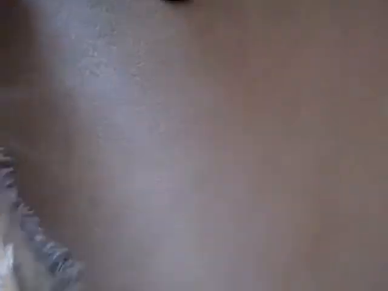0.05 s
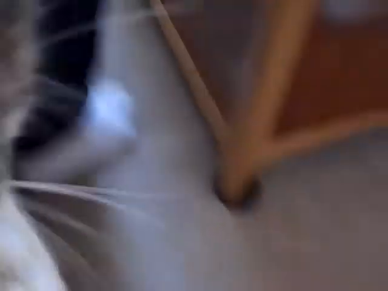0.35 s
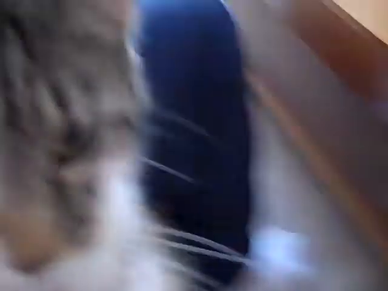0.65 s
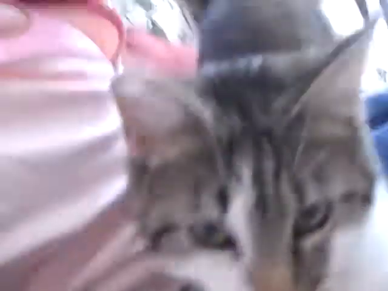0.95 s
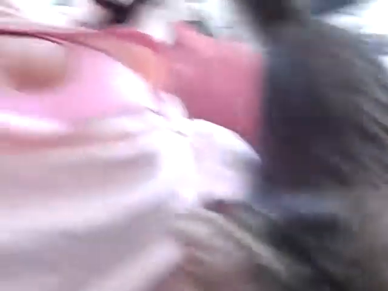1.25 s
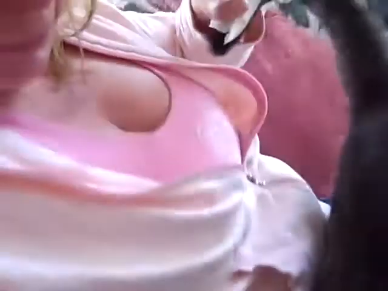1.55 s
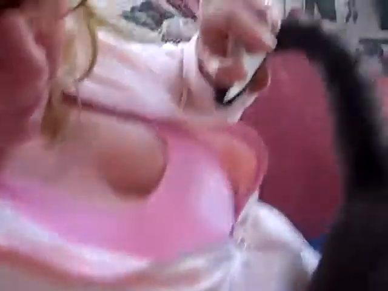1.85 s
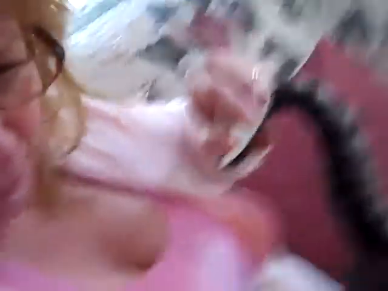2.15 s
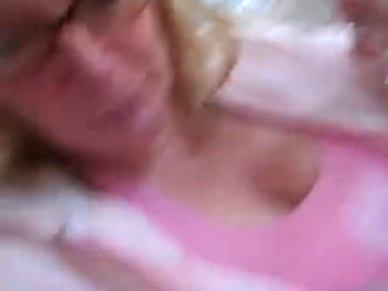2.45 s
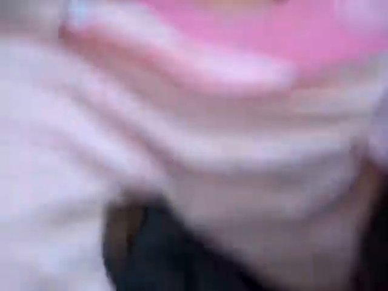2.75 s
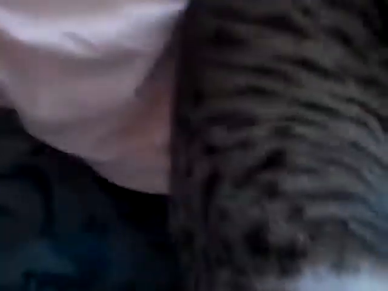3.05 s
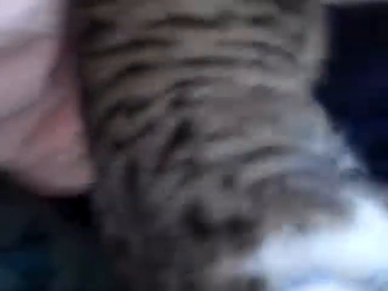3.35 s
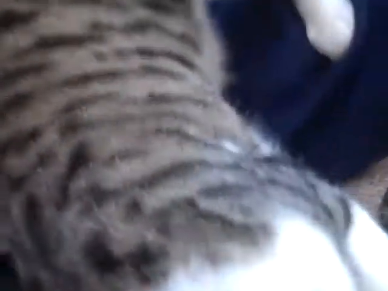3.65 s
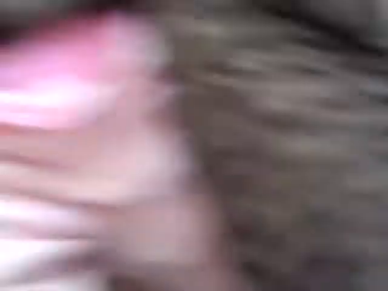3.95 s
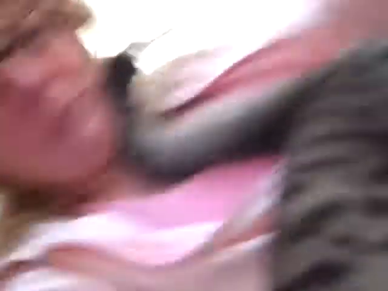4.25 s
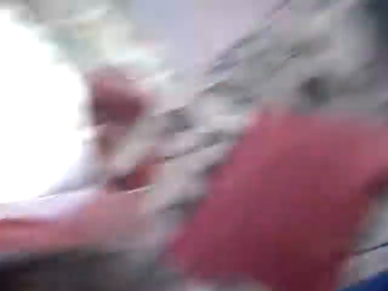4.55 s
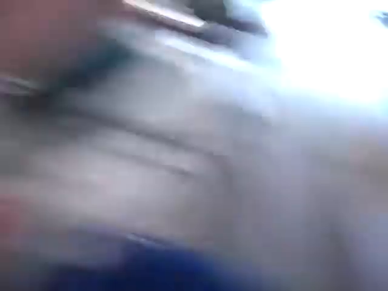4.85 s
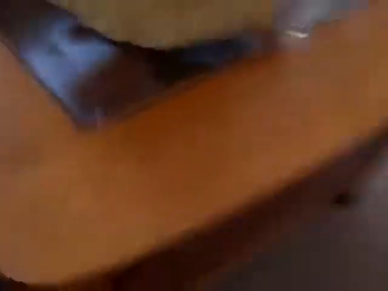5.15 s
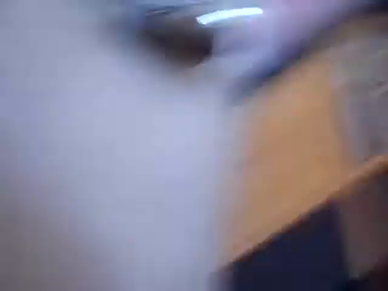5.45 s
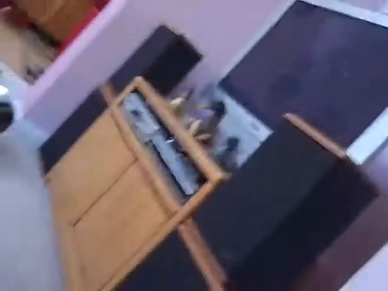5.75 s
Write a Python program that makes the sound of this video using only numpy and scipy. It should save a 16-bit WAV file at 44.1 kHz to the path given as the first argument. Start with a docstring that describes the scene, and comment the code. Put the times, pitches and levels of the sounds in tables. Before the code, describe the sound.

Close cat purring with light metallic clinks, mixed with rustling and handling knocks that grow loudest near the end.

```python
"""A house cat purrs as it climbs over a lap, a hand's width from a small hand-held camera.
From the start, strokes of vocal-fold pulses excite its chest and throat, while fur and cloth brush
the camera and fingers knock on the case. From 1.2 to 3.3 s small metal pieces jingle in their free
modes; around 3 s the nose passes closest and its turbulent air rasps. After 4 s the rubbing and
knocking grow firmer over the purr, and are loudest near 5.6 s."""
import sys
import numpy as np
from scipy import signal
from scipy.fft import rfft, irfft
from scipy.io import wavfile

SR = 44100
rng = np.random.default_rng(int(sys.argv[2]) if len(sys.argv) > 2 else 0)


def file_out(sig):
    """Save sig as 16-bit WAV at sys.argv[1]."""
    # one column per channel
    cols = np.atleast_2d(sig).T
    # limit, then scale
    lim = np.clip(cols, -1, 1)
    pcm = np.round(lim * 32767).astype(np.int16)
    wavfile.write(sys.argv[1], SR, pcm)


N = 259308
T = np.arange(N) / SR
EVENT_T = T[:SR // 6]  # time axis of one short event


def undb(db):
    """Amplitude ratio of a level in decibels."""
    return 10 ** (np.asarray(db) / 20)


def unit(x):
    """Normalisation to rms 1."""
    return x / np.sqrt(np.mean(x ** 2) + 1e-30)


def pan(db):
    """Constant-power panning; db is left minus right, as is every pan_db."""
    return unit(undb(np.array([[db], [-db]]) / 2))


def noise(correlation, size=N):
    """Partly coherent white noise at the two microphone ports."""
    mid, side = rng.standard_normal((2, size))
    return np.sqrt((1 + correlation) / 2) * mid + np.sqrt((1 - correlation) / 2) * np.array([side, -side])


def colour(x, points, size=4096):
    """Minimum-phase filter through (frequency_hz, gain_db) points."""
    hz, db = np.transpose(points)
    bins_hz = np.maximum(np.fft.rfftfreq(size, 1 / SR), 1)
    cepstrum = irfft(np.log(undb(np.interp(np.log(bins_hz), np.log(hz), db))))
    cepstrum[1:size // 2] *= 2
    cepstrum[size // 2 + 1:] = 0
    response = irfft(np.exp(rfft(cepstrum)))
    return signal.fftconvolve(x, response[None], axes=-1)[:, :x.shape[-1]]


def resonate(x, hz, width_hz):
    """Second-order resonator with gain 1 at its centre."""
    return signal.lfilter(*signal.iirpeak(hz, hz / width_hz, fs=SR), x)


def band(x, hz, width_hz):
    """Two resonators in cascade give a band with steeper skirts."""
    return resonate(resonate(x, hz, width_hz), hz, 2 * width_hz)


def resonances(x, modes):
    """Modal superposition: parallel resonators share one excitation."""
    return sum(undb(db) * resonate(x, hz, width_hz) for hz, width_hz, db in modes)


def fade(t, t60):
    """Exponential decay, 60 dB in t60 seconds."""
    return undb(-60 * t / t60)


def burst(x, db):
    """Energy normalisation: a transient gets the energy of 10 ms at this level."""
    return x * undb(db) * np.sqrt(SR / 100 / np.mean(np.sum(x ** 2, axis=-1)))


def add(out, start_s, x):
    """Superposition of x on out from start_s on."""
    i = max(int(start_s * SR), 0)
    out[:, i:i + x.shape[-1]] += x[..., :max(N - i, 0)]


def swell(peak_s, rise_s, fall_s, roundness=1.29):
    """Envelope of a movement, 20 dB down at rise_s before its peak and fall_s after."""
    return undb(-20 * np.maximum((peak_s - T) / rise_s, (T - peak_s) / fall_s) ** roundness)


def rough_noise(correlation, patchy_db, grain_db):
    """Random amplitude modulation: catching fibres or ragged air give fine grains in uneven patches."""
    patches = np.interp(T, np.arange(1400) / 220, np.minimum(rng.standard_normal(1400), 2))
    grains = np.repeat(np.minimum(rng.standard_normal(N // 16 + 1), 2.3), 16)[:N]
    return noise(correlation) * undb(patchy_db * patches + grain_db * grains)


# spectrum of room and microphone noise: frequency_hz, gain_db
ROOM_SPECTRUM = [(25, -14), (60, 3), (90, -3.5), (120, 9), (170, 6), (300, 1.5), (600, 0.5), (1200, -7),
                 (2500, -9.5), (5000, -15), (7700, -61), (10000, -16.5), (14000, -21)]
def room(level_db=-59):
    """Stationary noise of the quiet room and the microphone."""
    return undb(level_db) * unit(colour(noise(0.27), ROOM_SPECTRUM)) * pan(1)


# resonances of case and ports: centre_hz, width_hz, left_db, right_db
PORT_MODES = [(1333, 21, 2, -0.5), (1874, 650, 10.5, 9.5), (2360, 46, 4.5, -30), (2907, 53, -15, 5),
              (4180, 120, -17, -9), (4460, 31, -20, -4), (6140, 2300, -3.5, 3.5), (7060, 790, -24, 5.5),
              (8060, 600, 14.5, -20), (9600, 1850, 7.5, -24), (13600, 300, 1, -21)]
def ports(x):
    """Structure-borne sound reaches each port through its own resonances."""
    return x + sum(undb([[left], [right]]) * resonate(x, hz, width) for hz, width, left, right in PORT_MODES)


# swings of the camera: peak_s, rise_s, fall_s, level_db
CAMERA_SWINGS = [(.12, 0.38, 0.28, -59.5), (4.15, 0.33, 0.36, -53.5), (4.97, 0.23, 0.68, -54.5),
                 (5.52, 0.086, 0.13, -66), (5.79, 0.24, 0.2, -47)]
# spectrum of their rumble: frequency_hz, gain_db
RUMBLE_SPECTRUM = [(25, -28), (50, -30), (130, 3), (240, -5.5), (400, -2.5), (700, -7.5), (1200, -9),
                   (1700, -12.5), (3000, -34)]
def rumble():
    """Low-frequency handling noise follows each swing of the camera in the hand."""
    motion = sum(undb(db) * swell(*timing, roundness=1) for *timing, db in CAMERA_SWINGS)
    return unit(colour(rough_noise(0.12, patchy_db=3, grain_db=5), RUMBLE_SPECTRUM)) * motion


# resonances of the shell: centre_hz, width_hz, gain_db
SHELL_MODES = [(1844, 54, -3), (4300, 240, 2), (6780, 1170, 3)]
def scratches(catches_per_s=260, spread_db=5):
    """Stick-slip: fibres catch and let go, each impulse ringing the shell at one port."""
    catches = (rng.random((2, N)) < catches_per_s / SR) * np.sign(rng.standard_normal((2, N)))
    strength = undb(spread_db * np.minimum(rng.standard_normal((2, N)), 1.5))
    return unit(ports(resonances(catches * strength, SHELL_MODES)))


# light, unbroken rustle of fur and cloth: time_s, level_db
LIGHT_RUSTLE = [(0.0, -62), (0.36, -61.5), (0.75, -65), (1.12, -59), (1.4, -63), (2.22, -60), (3.16, -54),
                (3.63, -66), (3.93, -67), (4.0, -73), (5.15, -73), (5.88, -58)]
# firm rubs: peak_s, rise_s, fall_s, hiss_db, scrape_db, fizz_db
FIRM_RUBS = [(.19, 0.39, 0.24, -62, -60.5, -75), (.84, 0.095, 0.029, -57, -58.5, -67),
             (.92, 0.049, 0.05, -68, -58, -74), (1.10, 0.05, 0.065, -50.5, -77, -75),
             (1.63, 0.28, 0.078, -54.5, -68, -68), (2.92, 0.45, 0.3, -81, -64, -80),
             (3.21, 0.043, 0.083, -61, -69, -75), (4.12, 0.14, 0.13, -46.5, -47.5, -50.5),
             (4.31, 0.085, 0.053, -51, -56.5, -59), (4.531, 0.15, 0.078, -43, -52, -47),
             (4.69, 0.16, 0.69, -49.5, -57, -54), (4.804, 0.04, 0.064, -42, -51.5, -47.5),
             (4.88, 0.082, 0.023, -59, -62, -73), (4.995, 0.085, 0.06, -41, -49, -52),
             (5.059, 0.054, 0.058, -55, -59, -74), (5.33, 0.2, 0.21, -67, -67, -68),
             (5.46, 0.099, 0.35, -51.5, -58, -58), (5.531, 0.0087, 0.034, -46.5, -37.5, -62),
             (5.598, 0.026, 0.059, -29, -39, -42), (5.635, 0.037, 0.055, -26.5, -34.5, -35),
             (5.69, 0.14, 0.12, -37.5, -46.5, -49), (5.755, 0.052, 0.078, -41, -68, -70)]
# spectra of fur on the ports, fur on the case and single hairs: frequency_hz, gain_db
HISS_SPECTRUM = [(1500, -21.5), (2600, -1.5), (4000, 3.5), (5200, 1.5), (6500, 3), (7700, 0.5), (8600, -2),
                 (10000, -13), (12000, -25), (14200, -22), (15000, -39)]
SCRAPE_SPECTRUM = [(200, -0.5), (600, 3), (1000, 4), (1400, 0.5), (1850, -6.5), (2300, -5), (3200, 0.5),
                   (4500, 1.5), (8000, -21)]
FIZZ_SPECTRUM = [(5000, -42), (8000, 9.5), (9500, 5), (12000, -5), (14200, -5), (15000, -33)]
def rubbing():
    """Friction noise of fur and cloth over the camera's rumble; overlapping rubs add in power."""
    rustle_db = np.interp(T, *np.transpose(LIGHT_RUSTLE))
    gains = undb([rustle_db + 1, rustle_db - 6.5, rustle_db - 9])
    for peak_s, rise_s, fall_s, *levels_db in FIRM_RUBS:
        gains = np.hypot(gains, undb(levels_db)[:, None] * swell(peak_s, rise_s, fall_s))
    hiss_gain, scrape_gain, fizz_gain = gains
    hiss = unit(ports(colour(rough_noise(-0.099, patchy_db=2.5, grain_db=2.5), HISS_SPECTRUM)))
    scrape = unit(ports(colour(rough_noise(0.31, patchy_db=4.5, grain_db=4), SCRAPE_SPECTRUM)))
    fizz = unit(colour(rough_noise(0, patchy_db=4, grain_db=0), FIZZ_SPECTRUM))
    case = scrape * scrape_gain + rumble()
    fur = (undb(-2) * hiss + undb(-6) * scratches()) * hiss_gain
    lean = (hiss_gain / undb(-50)) ** np.array([[-.06], [.06]])  # firm to the right, light to the left
    return lean * (fur + case) + fizz * fizz_gain


# drags of a fingertip: peak_s, rise_s, fall_s, pitch_hz, level_db
FINGER_DRAGS = [(4.52, .08, 0.097, 1870, -56), (4.7, 0.025, .03, 4450, -52), (4.79, 0.036, .06, 4200, -54),
                (4.83, .1, 0.21, 1870, -56.5), (5.0, 0.095, .12, 1850, -61)]
def finger_drags(relative_width=.1):
    """Forced vibration: a dragging fingertip keeps one resonance of the shell sounding."""
    drag = rough_noise(.2, patchy_db=4, grain_db=3)
    return sum(undb(db) * swell(*timing) * unit(band(drag, hz, relative_width * hz))
               for *timing, hz, db in FINGER_DRAGS) * pan(-2.3)


# bumps of the whole camera and creaks of its case: start_s, level_db, pitch_hz, t60_s
CAMERA_BUMPS = [(0.586, -46, 110, 0.031), (0.597, -49, 139, 0.036), (3.635, -50.5, 85, 0.024),
                (4.115, -46, 140, 0.13), (4.152, -39.5, 139, 0.12), (5.662, -47, 123, 0.036)]
CASE_CREAKS = [(0.2774, -39, 3840, 0.004), (0.2795, -39, 1700, 0.018), (0.586, -48, 1880, 0.025),
               (0.597, -45.5, 1930, 0.019), (2.391, -47, 1820, 0.0086), (2.481, -48, 1600, 0.009),
               (4.715, -40.5, 1980, 0.015), (4.745, -59, 1900, 0.018), (4.972, -41.5, 7450, 0.0065),
               (5.3516, -33, 2740, 0.002), (5.587, -47, 1830, 0.057), (5.592, -36, 7240, 0.014),
               (5.599, -33.5, 1780, 0.073), (5.645, -42, 2450, 0.024)]
# twists of the case: start_s, level_db, pitch_hz, t60_s
CASE_TWISTS = [(1.549, -50, 140, .03), (2.168, -48, 520, 0.01), (2.389, -39, 333, 0.019),
               (2.965, -52, 450, .02), (3.0, -45, 268, 0.068), (3.203, -50, 320, 0.028),
               (3.323, -53, 425, .015), (3.631, -37, 440, 0.016), (3.634, -36, 106, 0.037),
               (4.212, -40, 277, 0.018), (4.414, -52, 125, 0.022), (4.714, -40, 420, .025),
               (4.818, -47, 180, .015), (4.972, -40, 270, 0.02), (5.005, -44, 350, 0.044),
               (5.53, -47, 570, .03), (5.597, -34, 640, 0.19), (5.638, -34, 600, 0.044),
               (5.645, -39, 220, .04)]
def grip(thud_relative_width=0.61):
    """Damped vibration: as the hand shifts its hold, the camera bumps, creaks and twists with a thud."""
    out, t = np.zeros((2, N)), EVENT_T
    for start_s, db, hz, t60 in CAMERA_BUMPS + CASE_CREAKS:
        vibration = np.sin(2 * np.pi * hz * t) * fade(t, t60)
        add(out, start_s, burst(band(vibration, hz, hz), db) * pan(-8.5))
    antiphase = np.array([[1], [-1]])  # a twist presses one port in and the other out
    for start_s, db, hz, t60 in CASE_TWISTS:
        slip = rng.standard_normal(len(t)) * fade(t, t60)
        thud = band(slip, hz, thud_relative_width * hz)
        add(out, start_s, burst(thud, db) * antiphase)
    return out


# spectrum of a tick: frequency_hz, gain_db
TICK_SPECTRUM = [(1200, -15.5), (2200, -10.5), (3100, 2.5), (4000, 8), (5200, 3), (6300, 7), (8600, 1),
                 (10000, -7), (12000, -6), (14200, -15), (15000, -34)]
def tick(db, t60, pan_db):
    """Broadband transient: a bright, decaying burst of noise heard through the ports."""
    hiss = noise(0.042, size=len(EVENT_T)) * fade(EVENT_T, t60)
    return burst(ports(colour(hiss, TICK_SPECTRUM)), db) * pan(pan_db)


# knocks on the case, and single thumps and clicks of the purr:
# start_s, level_db, pitch_hz, t60_s, tick_db, pan_db
SHORT_KNOCKS = [(0.042, -52, 500, 0.01, -74, 0), (0.081, -47.5, 424, 0.029, -59, 1.8),
                (0.102, -47.5, 470, 0.013, -74, 2), (0.132, -52, 440, 0.014, -72, 2),
                (0.172, -55.5, 470, 0.014, -72, 2), (0.115, -48.5, 587, 0.0019, -55, 3),
                (0.2776, -21.5, 1105, 0.0044, -38, -4), (0.412, -56, 950, 0.0025, -54, 2),
                (0.4533, -54.5, 694, 0.0021, -55.5, 1), (0.586, -38, 211, 0.023, -47, -17),
                (0.594, -46, 744, 0.0014, -45.5, 3), (2.171, -44.5, 1100, 0.0024, -48.5, 1),
                (2.27, -42.5, 970, 0.003, -76, -7), (2.39, -47.5, 1230, 0.0048, -37, 2),
                (2.3948, -45, 574, 0.012, -70, -7), (2.479, -43, 600, 0.017, -54, 3),
                (2.551, -50.5, 890, 0.0024, -62, 0), (3.6333, -39, 486, 0.031, -58, -5),
                (3.6391, -42.5, 552, 0.03, -68, 4), (4.0884, -45, 1460, 0.0013, -66, -11),
                (4.113, -30, 246, 0.058, -60, -1), (4.147, -34, 197, 0.022, -66, 0),
                (4.156, -41.5, 232, 0.24, -60, 1), (4.182, -37.5, 790, 0.0079, -69, -13),
                (4.315, -36.5, 240, 0.037, -66, 0), (4.372, -48.5, 240, 0.091, -70, 0),
                (4.7145, -41, 835, 0.00083, -29.5, 9), (4.727, -44.5, 1220, 0.00054, -41, -2),
                (4.82, -50, 1900, 0.016, -64, -8), (5.221, -49.5, 1300, 0.00086, -50, 10),
                (5.2279, -46.5, 1200, 0.00049, -51, 0), (5.319, -43, 1890, 0.018, -75, -8),
                (5.3512, -32, 802, 0.013, -32.5, -10.5), (5.491, -44, 830, 0.0043, -71, -12),
                (5.6412, -30, 1420, 0.0014, -22, 3.5), (5.6676, -35, 198, 0.0012, -47, 0)]
# modes of the plastic case: pitch_hz, gain_db, t60_s
CASE_MODES = [(306, -13, 0.011), (522, -9, 0.04), (742, -16.5, 0.036), (1235, -11, 0.0064),
              (1578, -5.5, 0.036), (1850, -3, 0.011), (3000, -3.5, 0.0026)]
def knocks(ring_db=16.5, rattle_db=-9, tick_t60=0.012, rattle_t60=0.017):
    """Impulsive excitation: a damped push, low for a thump and high for a click, rings the case."""
    out, t = np.zeros((2, N)), EVENT_T
    modes = [(hz, np.log(1000) / np.pi / t60, db) for hz, db, t60 in CASE_MODES]  # decay sets bandwidth
    for start_s, db, hz, t60, tick_db, pan_db in SHORT_KNOCKS:
        push = resonate(np.sin(2 * np.pi * hz * t) * fade(t, t60), hz, 0.8 * hz)
        # the two ports sit on different parts of the shell
        shake = noise(0.057, size=len(t)) * fade(t, rattle_t60)
        rattle = resonate(resonate(shake, hz, 0.88 * hz), hz, 3 * hz)
        blow = unit(push) + undb(rattle_db) * unit(rattle)
        ring = undb(ring_db) * resonances(blow, modes)
        add(out, start_s, burst(blow + ring, db) * pan(pan_db))
        add(out, start_s, tick(tick_db, tick_t60, pan_db))
    return out


# scuffs against the camera, and a few sharp clicks of the purr: start_s, level_db, t60_s, pan_db
SHORT_TICKS = [(0.903, -51.5, 0.062, 0), (0.98, -52.5, 0.038, -4), (1.1528, -38.5, 0.0023, 12),
               (1.156, -40, 0.051, -5), (1.17, -34, 0.078, 2), (1.202, -46, 0.046, -1),
               (1.224, -51, 0.015, 2), (1.244, -45, 0.16, 0), (1.315, -44.5, 0.033, 0),
               (1.326, -43, 0.035, -3), (1.489, -53.5, 0.025, -3), (1.5486, -35.5, 0.0044, 2.5),
               (1.657, -48.5, 0.07, 1), (1.935, -43.5, 0.035, -4), (1.948, -43.5, 0.14, -1),
               (2.118, -40, 0.04, -5.5), (2.138, -45.5, 0.12, -2), (2.228, -45, 0.093, 6),
               (2.852, -62, 0.005, -8), (2.954, -60, 0.012, -1), (4.217, -55, 0.0093, -11),
               (4.373, -51.5, 0.0076, 8), (4.445, -50.5, 0.034, 1), (4.629, -47.5, 0.0084, 3),
               (4.837, -57.5, 0.019, 6), (4.974, -49, 0.014, -11), (5.233, -51, 0.017, 5),
               (5.528, -39, 0.085, -1), (5.599, -41, 0.036, -5), (5.619, -41, 0.13, -3)]
def ticks():
    """Noise transients: the decay time makes each a sharp click or a longer scuff."""
    out = np.zeros((2, N))
    for start_s, db, t60, pan_db in SHORT_TICKS:
        add(out, start_s, tick(db, t60, pan_db))
    return out


def metal_ring(modes, bright_db):
    """Free vibration: decaying modes, in a different phase at each port; bright_db acts above 5 kHz."""
    ring = 0
    for hz, db, t60 in modes:
        phase = rng.uniform(0, 2 * np.pi) + rng.standard_normal((2, 1))
        amplitude = undb(db + bright_db * (hz > 5000))
        ring += amplitude * np.sin(2 * np.pi * hz * EVENT_T + phase) * fade(EVENT_T, t60)
    return ring


# modes of two small metal pieces and the link they hang on: pitch_hz, gain_db, t60_s
FIRST_MODES = [(3635, 3.5, 0.11), (3780, -14, 0.065), (7600, -11, 0.15), (7940, 1.5, 0.074),
               (14150, -31, 0.082)]
SECOND_MODES = [(3180, 5.5, 0.11), (3330, -1, 0.13), (7325, 2, 0.11), (7985, -2, 0.16), (12600, -22, 0.13),
                (14110, -20, .1)]
LINK_MODES = [(8970, 7, 0.099), (9080, -22, .08), (10750, -19, .08), (14080, -6, 0.092)]
# clinks: start_s, first_db, first_bright_db, second_db, second_bright_db, link_db, settle_db, pan_db
METAL_CLINKS = [(1.154, -45, 10, -55, 0, -47, -6, 10), (1.171, -52, 6, -58, 1, -53, -14, 3),
                (1.245, -56, 2, -58, -3, -70, -8, 4), (1.549, -53, -8, -56, -3, -68, -21, -7),
                (1.588, -72, 0, -56, -7, -75, 10, -1), (1.657, -59, 4, -64, -2, -70, -2, 0),
                (1.9945, -34, 15, -53, 5, -48.5, -4.5, 6), (2.02, -56, 23, -48, 19, -51, -10, 8),
                (2.172, -51, 11, -58, 5, -71, 11, 2), (2.183, -48, 27, -51, 9, -47.5, 8, 14),
                (2.228, -55, 2, -60, 3, -70, -4, -7), (2.302, -44.5, 30, -59, -3, -68, 8, 12),
                (2.34, -56, 14, -64, 10, -70, -6, 12), (2.392, -46, 20, -60, 3, -71, 3, 8),
                (2.490, -51.5, 11, -61, 10, -70, 15, 9), (2.524, -45.5, 18, -62, 6, -75, 13, 11),
                (2.581, -44, 28, -40, 15, -63, -3, 7), (2.79, -40.5, -2, -53, -3, -68, -8, -1),
                (3.159, -55, 4, -50, 18, -59, -14, 10), (3.227, -41, -8, -49, -6, -53, -7, 2)]
def jingle(contact_db=-23, rebound_db=-13, rebounds=3, gap_s=.017, settle_t60=0.3):
    """Collision and rebound: metal pieces touch, ring as they settle and rattle on more weakly."""
    out = np.zeros((2, N))
    for (start_s, first_db, first_bright_db, second_db, second_bright_db,
         link_db, settle_db, pan_db) in METAL_CLINKS:
        settle = undb(settle_db * (1 - fade(EVENT_T, settle_t60)))
        pieces = [(FIRST_MODES, first_db, first_bright_db),
                  (SECOND_MODES, second_db, second_bright_db),
                  (LINK_MODES, link_db, 0)]
        for modes, db, bright_db in pieces:
            ring = burst(metal_ring(modes, bright_db) * settle, db + 3.5) * pan(pan_db)
            touch = ring + tick(db + contact_db, 0.042, pan_db)
            add(out, start_s, touch)
            lags_s = np.cumsum(gap_s * rng.uniform(0.54, 1.5, rebounds))
            for k, lag_s in enumerate(lags_s, 1):
                add(out, start_s + lag_s, touch * undb(rebound_db + settle_db / 2) / k)
    return out


# spectrum of the pop as the vocal folds part: frequency_hz, gain_db
POP_SPECTRUM = [(60, -13), (200, 2), (480, 2.5), (900, -8.5), (1400, -7), (1900, -28), (2500, -17),
                (4000, -37)]
def pops(impulses):
    """Impulse response: each sudden parting gives one clean pop."""
    return colour(impulses, POP_SPECTRUM)


# single louder wet pops: start_s, level_db
WET_POPS = [(1.032, -64), (1.177, -59), (1.271, -54), (1.282, -58), (1.657, -55), (1.906, -55),
            (1.983, -59), (2.09, -58), (2.231, -53), (2.583, -50), (2.993, -51), (3.012, -51),
            (3.207, -51.5)]
def wet_pops():
    """Isolated impulses pop on or between the purr's pulses."""
    out = np.zeros((2, N))
    pop = pops(signal.unit_impulse((1, SR // 20)))
    for start_s, db in WET_POPS:
        add(out, start_s, burst(pop, db))
    return out


def puffs(snaps, rise_s, t60, lead_s=0):
    """Pulsating flow: air swells and dies away around each impulse."""
    t = T[:SR // 10]
    flow = signal.fftconvolve(snaps[0], (1 - np.exp(-t / rise_s)) * fade(t, t60))
    return unit(flow[int(lead_s * SR):][:N])


def wet_clicks(snaps, uneven_db=2.4, strays_per_s=22, stray_db=-6):
    """Irregular excitation: the moist folds part unevenly, and stray clicks fall between openings."""
    strays = (rng.random(N) < strays_per_s / SR) * rng.random(N)
    strength = undb(uneven_db * np.minimum(rng.standard_normal(N), 1))
    return (snaps + undb(stray_db) * strays) * strength


# resonances of the chest: centre_hz, width_hz, gain_db
CHEST_MODES = [(72.5, 21, 1), (118.4, 49, 8), (149, 100, -10), (220, 105, -1.5)]
def chest(snaps):
    """Body resonance: each pulse and its puff of air thump the low modes of the chest."""
    thump = unit(snaps) + .42 * noise(.6) * puffs(snaps, rise_s=.002, t60=.13)
    spectrum = [(25, -28), (50, -11.5), (110, 2), (400, 1.5), (1000, -14.5), (4000, -69)]
    return unit(colour(resonances(thump, CHEST_MODES), spectrum))


# resonances of the throat: centre_hz, width_hz, gain_db
THROAT_FORMANTS = [(318, 92, -7.5), (470, 69, 3.5), (810, 73, 4), (1030, 130, 5), (1450, 92, -23)]
def throat(snaps, clicks):
    """Formants: wet clicks and breath ring the cavity of the throat."""
    crackle = noise(.8) * puffs(clicks, rise_s=.0005, t60=.01)
    breath = noise(.5) * puffs(snaps, rise_s=.001, t60=.08)
    excitation = .7 * unit(clicks) + .7 * crackle + .35 * breath
    spectrum = [(150, 4), (400, 6.5), (1450, -7.5), (2300, -31), (6000, 11)]
    return unit(colour(resonances(excitation, THROAT_FORMANTS), spectrum))


# spectrum of air in the throat: frequency_hz, gain_db
GURGLE_SPECTRUM = [(90, -15), (200, -4.5), (450, 3.5), (650, -6), (1000, 3.5), (1500, -6.5), (2400, -22.5),
                   (5000, -53)]
def gurgle(snaps):
    """Modulated turbulence: each opening lets a gust gurgle through the throat."""
    gusts = puffs(snaps, rise_s=.006, t60=.052, lead_s=.007)
    return unit(colour(rough_noise(0.8, patchy_db=2.5, grain_db=-0.5) * gusts, GURGLE_SPECTRUM))


# spectrum of air in the nose: frequency_hz, gain_db
RASP_SPECTRUM = [(300, -10), (900, 6), (1500, -4), (2000, 1), (2500, 7.5), (3000, 4.5), (3700, 11.5),
                 (4400, -5), (5400, -4), (6300, 3.5), (7300, -7), (8300, -28), (14000, -17)]
# rasp as the nose passes the camera: time_s, level_db
RASP_LEVELS = [(2.35, -89), (2.58, -55), (2.8, -52), (2.93, -47), (2.99, -55), (3.1, -60.5), (3.2, -49),
               (3.43, -54), (3.52, -68)]
def rasp(snaps, clicks):
    """Turbulence in the nose pulses with the folds and is heard only close by."""
    flow = puffs(snaps + 0.38 * clicks, rise_s=0.0096, t60=0.041, lead_s=0.011)
    air = unit(colour(rough_noise(0.23, patchy_db=3.5, grain_db=2) * flow, RASP_SPECTRUM))
    nearness = undb(np.interp(T, *np.transpose(RASP_LEVELS)))
    return air * nearness * pan(-1.5)


def effort(start_s, end_s, attack_s=0.065, release_s=0.11, edge_db=-4.5):
    """Envelope of one stroke of breath: it swells from a weak start, holds and dies away."""
    held = np.clip(np.minimum((T - start_s) / attack_s, (end_s - T) / release_s), 0, 1)
    gate = np.interp(T, [start_s - .02, start_s - .005, end_s, end_s + .025], [0, 1, 1, 0])
    return gate * undb(edge_db * (1.5 - held))


def wheeze(snaps, strokes):
    """Narrow-band flow noise: the nostrils wheeze softly, at a new pitch and width for each stroke."""
    air = noise(.3) * puffs(snaps, rise_s=.007, t60=.048, lead_s=.009)
    return sum(undb(db) * effort(start_s, end_s) * unit(band(air, hz, width_hz))
               for start_s, end_s, *_, hz, width_hz, db in strokes) * pan(-.5)


def larynx(strokes, jitter_s=.0009, shimmer_db=1.8, closing_s=.012, closing_db=-12):
    """Glottal pulses with jitter and shimmer: the folds snap open once a cycle and shut more softly."""
    snaps = np.zeros((1, N))
    for start_s, end_s, pulse_hz, *_ in strokes:
        cycles_s = np.arange(start_s, end_s, 1 / pulse_hz)
        for cycle_s, (late, loud, lag, soft) in zip(cycles_s, rng.standard_normal((64, 4))):
            add(snaps, cycle_s + jitter_s * late, undb([shimmer_db * loud]))
            add(snaps, cycle_s + closing_s * (1 + 0.206 * lag), undb([closing_db + shimmer_db * soft]))
    return snaps


# strokes of the purr, in and out by turns: start_s, end_s, pulse_hz, chest_db, throat_db, pop_db,
# gurgle_db, swell_db_per_s, wheeze_hz, wheeze_width_hz, wheeze_db
PURR_STROKES = [(.009, 0.7, 26.66, -50, -61.5, -62, -60.5, -9, 4900, 300, -64.5),
                (0.769, .99, 29, -71, -76, -82, -77, 0, 4200, 700, -75),
                (1.039, 1.231, 31.2, -58, -63, -54.5, -69, -4, 3620, 700, -62),
                (1.317, 1.485, 29.7, -62, -72, -57.5, -87, -11, 3470, 670, -62),
                (1.631, 2.464, 27.56, -56.5, -59, -62.5, -67.5, -5, 3700, 900, -64.5),
                (2.549, 3.055, 29.52, -61.5, -58.5, -59.5, -56.5, 1.5, 3540, 900, -60.5),
                (3.062, 3.543, 28.94, -60, -62, -73, -67, -3, 3510, 654, -59.5),
                (3.713, 4.451, 27.05, -55, -72, -75, -74, 18, 3620, 700, -92),
                (4.542, 4.99, 27.77, -61, -65, -75, -68, 25, 3700, 700, -87),
                (5.056, 5.913, 27.44, -60, -67, -79, -72.5, 23, 3650, 700, -75)]
def purr():
    """Source and filter: one pulse train drives chest, throat and nose as each stroke swells or sags."""
    snaps = larynx(PURR_STROKES)
    clicks = wet_clicks(snaps)
    gains = breath = 0
    for start_s, end_s, _, *levels_db, swell_db_per_s, _, _, _ in PURR_STROKES:
        from_middle_s = np.clip(T, start_s, end_s) - (start_s + end_s) / 2
        push = effort(start_s, end_s) * undb(swell_db_per_s * from_middle_s)
        gains += undb(levels_db)[:, None] * push
        breath += push
    voices = [undb(-2) * chest(snaps), undb(-3) * throat(snaps, clicks), unit(pops(snaps)), gurgle(snaps)]
    body = sum(voice * gain for voice, gain in zip(voices, gains))
    return body + breath * rasp(snaps, clicks) + wheeze(snaps, PURR_STROKES)


def scene():
    """Superposition of the quiet room, the cat, contact with the camera and the metal pieces."""
    return room() + purr() + wet_pops() + rubbing() + finger_drags() + knocks() + ticks() + grip() + jingle()


def record(dry, cutoff_hz=14400):
    """Band limiting: the camera's steep low-pass filter cuts the top."""
    return signal.sosfilt(signal.ellip(8, .2, 70, cutoff_hz, fs=SR, output="sos"), dry)


dry = scene()
out = record(dry)
file_out(out)
```